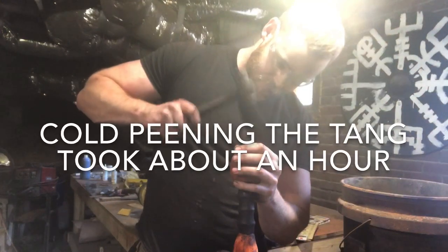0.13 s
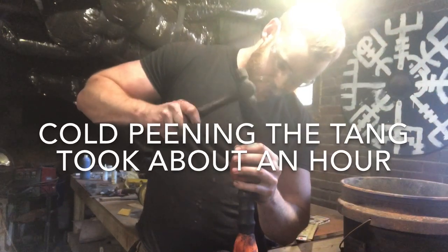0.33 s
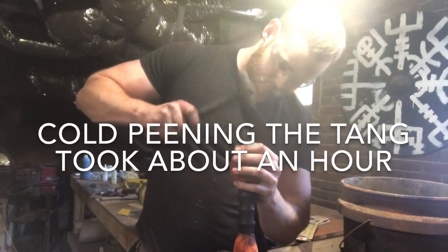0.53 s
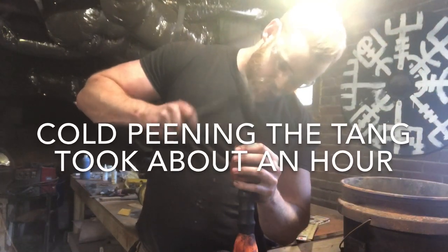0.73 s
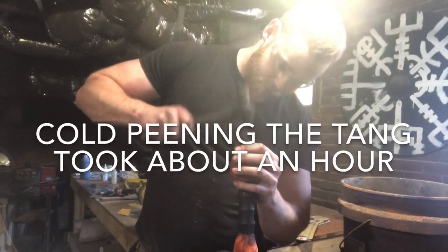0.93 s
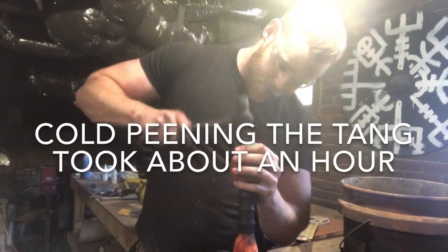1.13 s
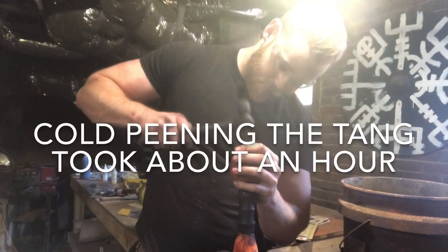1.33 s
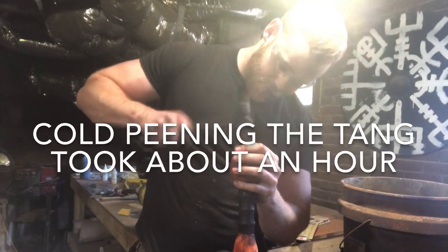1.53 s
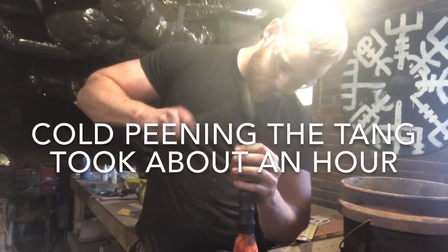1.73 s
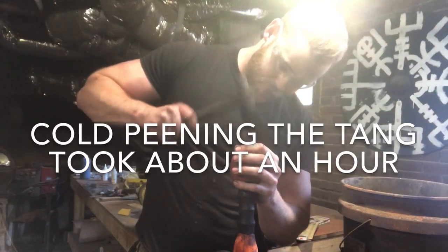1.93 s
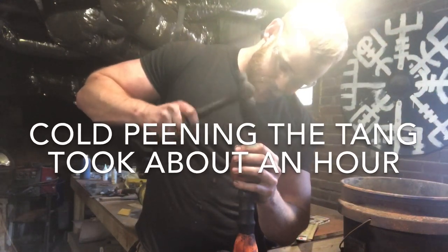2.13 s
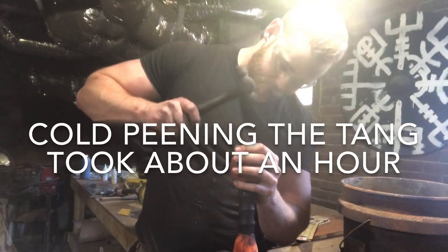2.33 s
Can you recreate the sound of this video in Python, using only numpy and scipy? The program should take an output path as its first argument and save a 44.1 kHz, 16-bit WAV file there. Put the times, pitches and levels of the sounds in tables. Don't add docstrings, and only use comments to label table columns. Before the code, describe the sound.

A small hammer peens a steel tang in quick, even, bright metallic clinks in a small workshop.

```python
import sys
import numpy as np
from scipy import signal
from scipy.fft import rfft, irfft
from scipy.io import wavfile
from scipy.ndimage import uniform_filter1d

SR = 44100
rng = np.random.default_rng(int(sys.argv[2]) if len(sys.argv) > 2 else 0)


def invert_db(x):
    u = np.asarray(x, float) / 20
    return 10 ** u


def inscribe(sig):
    pcm = np.round(np.clip(np.atleast_2d(sig).T, -1, 1) * 32767)
    wavfile.write(sys.argv[1], SR, pcm.astype(np.int16))


N = 108838
LENGTH = SR // 2

# (time [s], strength [dB], treble hardness [dB per octave above 3 kHz])
BLOWS = [(-.0225, 2, -3.5), (0.201, 2, -0.5), (0.428, 1, -0.5), (0.6469, 2, 0), (0.8841, 2, -1),
         (1.1057, 2, -2), (1.3342, 2, -0.5), (1.5489, 2, -1.5), (1.7688, 1.5, -1), (1.9914, 1.5, -2.5),
         (2.2101, 1, -1), (2.4346, 2, -0.5)]
# (frequency [Hz], density [dB per Hz])
CRACK_SPECTRUM = [(500, -33), (1000, -8.5), (2200, -12.5), (3050, -7.5), (5300, -20.5), (8000, -24),
                  (15400, -38), (16200, -75)]
HEAD_HZ = [1050, 1850, 2150, 2740, 3070, 3650, 4500, 4800, 5800, 6150, 6550, 9320, 12800, 13400]
# (level [dB], T60 [s])
HEAD_MODES = [(-27.5, .02), (-19, 0.03), (-19.5, 0.0095), (-14, 0.023), (-13.5, .025), (-11, 0.005),
              (-23.5, 0.012), (-21, 0.014), (-20.5, 0.024), (-16, 0.013), (-26, 0.027), (-27.5, 0.019),
              (-34, 0.02), (-41, 0.015)]
PING_HZ = [5900, 6050, 8000, 8350, 10900, 11870, 12500, 14050, 14750]
PING_DB = [-41, -44, -52, -44, -52, -52, -56, -56, -60]
BENCH_HZ = [165, 279, 309, 398, 492, 567, 619, 824, 877, 991, 1095, 1188, 1275, 1400]
# (peak level [dB], peak time [s], sharpness [-])
BENCH_MODES = [(-41.5, 0.012, 0.52), (-27.5, 0.018, 1.5), (-35, 0.017, 0.67), (-34, 0.032, 3.27),
               (-42, 0.03, 1.67), (-32.5, 0.013, 4.8), (-32.5, 0.019, 3.2), (-28, 0.013, 4.9),
               (-23, 0.011, 3.07), (-26, 0.0059, 2.5), (-31.5, .01, 0.67), (-24, 0.012, 2.5),
               (-38, 0.0075, 0.75), (-34.5, 0.011, 2)]
BLADE_HZ = [130, 255, 290, 806, 906, 1114, 1227, 1335, 1820, 2326, 2836, 3332, 3483, 3844]
# (level [dB], T60 [s])
BLADE_MODES = [(-45, .7), (-54.5, .6), (-44.5, 0.7), (-54.5, 1.5), (-51, 1.3), (-38.5, .3), (-43.5, 0.48),
               (-58.5, .45), (-66, 2.9), (-50.5, 0.77), (-50, 0.63), (-66, 0.27), (-67.5, .4), (-67.5, 0.4)]
# (delay [s], level [dB])
WALLS = [(.009, -23), (0.026, -28), (.031, -31), (0.037, -37.5), (0.047, -40)]
# (frequency [Hz], density [dB per Hz])
ROOM_SPECTRUM = [(120, -27), (300, -12.5), (1100, -4.5), (2100, -19), (3000, -6.5), (4300, -16),
                 (7000, -23), (15700, -53)]
# (frequency [Hz], T60 [s])
ROOM_DECAY = [(200, 0.59), (1000, .22), (3000, 0.19), (6000, 0.14), (9000, 0.079), (14000, 0.14)]
# (frequency [Hz], share [0-1])
FRESH_SHARE = [(500, 0.3), (2000, 0.26), (6000, 0.33), (12000, 1)]
# (frequency [Hz], density [dB per Hz])
AIR_SPECTRUM = [(30, -29), (60, -1.5), (300, -9), (1200, -24.5), (2000, -36.5), (5000, -38), (15000, -54.5),
                (15300, -92)]

HEAD_HOLD_S, HEAD_RISE_S = 0.0012, 0.00033
ROOM_DB = -24


def blows():
    out = np.zeros(N + 2 * LENGTH)
    damp = grip()
    head, pings = head_modes(), ring(PING_HZ, PING_DB, 0.14, 0.00089)
    body = bench(damp) + blade()
    same_noise = rng.standard_normal((2, LENGTH))
    lumps = room_lumps()
    for time_s, strength_db, hard_db in BLOWS:
        hard = hardness(hard_db)
        crack_noise, room_noise = partly_new(same_noise)
        blow_clink = clink(head, crack_noise, hard_db, hard)
        ping = invert_db(4 * rng.standard_normal(len(PING_HZ))) @ pings
        room = invert_db(ROOM_DB) * coloured(tail(room_noise, lumps, damp), hard)
        blow = coloured(blow_clink, walls) + ping + body + room
        at = LENGTH + round(time_s * SR)
        out[at:at + LENGTH] += invert_db(strength_db) * blow
        ghost_at = at - round(0.0232 * SR)
        out[ghost_at:ghost_at + LENGTH] += invert_db(strength_db) * ghost(blow_clink)
        early = invert_db(strength_db) * smear(blow_clink)
        out[at - len(early):at] += early
    return out[LENGTH:LENGTH + N]


def clink(head, crack_noise, hard_db, hard):
    scatter = invert_db(0.6 * rng.standard_normal(len(HEAD_HZ)))
    modes = (hard(np.array(HEAD_HZ)) * scatter) @ head
    snap = invert_db(hard_db) * ring(4950, -4.5, 0.0016, 0.0001)[0]
    return modes + snap + crack(crack_noise, hard)


def hardness(hard_db):
    return lambda f: invert_db(hard_db * np.log2(np.clip(f, 3000, None) / 3000))


def head_modes():
    return ring(HEAD_HZ, *np.transpose(HEAD_MODES), HEAD_RISE_S, HEAD_HOLD_S)


def crack(noise, hard):
    t = np.arange(LENGTH) / SR
    fall = invert_db(-15.5 - 60 * np.maximum(t - 0.003, 0) / 0.023)
    burst = fall * (1 - np.exp(-t / HEAD_RISE_S))
    return burst * coloured(unit(shaped(noise, CRACK_SPECTRUM)), hard)


def partly_new(same_noise):
    def share(f):
        return np.clip(along(FRESH_SHARE, f), 0, 1)

    repeated = coloured(same_noise, lambda f: np.sqrt(1 - share(f)))
    return repeated + coloured(rng.standard_normal((2, LENGTH)), lambda f: np.sqrt(share(f)))


def bench(damp):
    return swell(BENCH_HZ, *np.transpose(BENCH_MODES)).sum(0) * damp


def grip():
    t = np.arange(LENGTH) / SR
    return invert_db(-5.5 / (1 + np.exp(-(t - 0.096) / 0.003)))


def blade():
    return ring(BLADE_HZ, *np.transpose(BLADE_MODES), 0.0052).sum(0)


def walls(f):
    return 1 + sum(invert_db(db) * np.exp(-2j * np.pi * f * delay) for delay, db in WALLS)


def room_lumps():
    shape = signal.stft(np.zeros(LENGTH), nperseg=256)[2].shape
    return unit(uniform_filter1d(rng.standard_normal(shape), size=6, axis=1))


def tail(noise, lumps, damp):
    seconds = np.arange(LENGTH) / SR
    hz, t, z = signal.stft(unit(shaped(noise, ROOM_SPECTRUM)), SR, nperseg=256)
    near = invert_db(-60 * t / along(ROOM_DECAY, hz)[:, None])
    far_corners = invert_db(-64.5 - ROOM_DB - 60 * t / 0.44)
    grain = invert_db(3 * lumps)
    stilled = np.where(hz[:, None] < 1500, np.interp(t, seconds, damp), 1)
    sound = signal.istft(z * (near + far_corners) * grain * stilled, SR, nperseg=256)[1][:LENGTH]
    return sound * (1 - np.exp(-seconds / 0.001))


def ghost(blow_clink):
    return invert_db(-45) * coloured(blow_clink, lambda f: 1 / (1 + (f / 6800) ** 16))


def smear(blow_clink):
    t = np.arange(LENGTH) / SR

    def colour(f):
        return uniform_filter1d(abs(rfft(blow_clink)), size=150) * (f < 8600)

    lead = unit(coloured(rng.standard_normal(LENGTH), colour))
    fading = invert_db(-39.5) * lead * np.exp(-t / 0.0038)
    return fading[:LENGTH // 4][::-1]


def air():
    hiss = unit(shaped(rng.standard_normal(N), AIR_SPECTRUM))
    hum = np.sin(2 * np.pi * 61 * np.arange(N) / SR)
    return invert_db(-53) * hiss + invert_db(-56.5) * hum


def ring(hz, db, t60, rise, hold=0):
    t = np.arange(LENGTH) / SR
    hz, db, t60, rise = (np.reshape(v, (-1, 1)) for v in (hz, db, t60, rise))
    fall = invert_db(db - 60 * np.maximum(t - hold, 0) / t60)
    return fall * (1 - np.exp(-t / rise)) ** 2 * np.sin(2 * np.pi * hz * t)


def swell(hz, db, peak, sharp):
    t = np.arange(LENGTH) / SR
    hz, db, peak, sharp = (np.reshape(v, (-1, 1)) for v in (hz, db, peak, sharp))
    envelope = (t / peak * np.exp(1 - t / peak)) ** sharp
    return invert_db(db) * envelope * np.sin(2 * np.pi * hz * t)


def along(points, hz):
    f, v = np.transpose(points)
    return np.interp(np.log(hz + 1), np.log(f + 1), v)


def unit(x):
    return x / np.sqrt(np.mean(x ** 2) + 1e-20)


def coloured(x, gain):
    return irfft(rfft(x) * gain(np.fft.rfftfreq(x.shape[-1], 1 / SR)), x.shape[-1])


def shaped(noise, spectrum):
    return coloured(noise, lambda f: invert_db(along(spectrum, f)))


def scene():
    return (blows() + air())[None]


def roll_off(x):
    return signal.sosfilt(signal.butter(12, 16530, fs=SR, output="sos"), x)


def record(dry):
    def microphone(f):
        return (1j * f / (48 + 1j * f)) ** 2 / (1 + (f / 16000) ** 60)

    return roll_off(coloured(dry, microphone))


dry = scene()
out = record(dry)
inscribe(out)
```